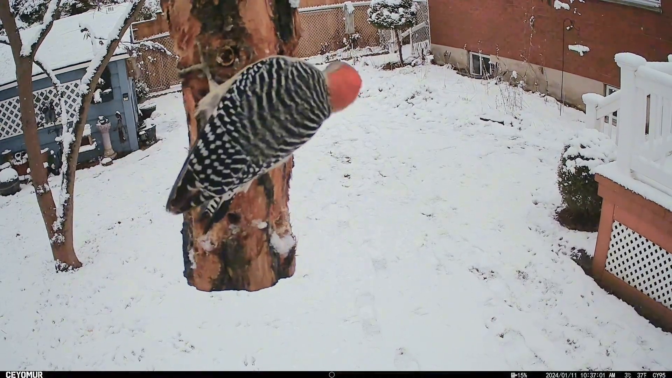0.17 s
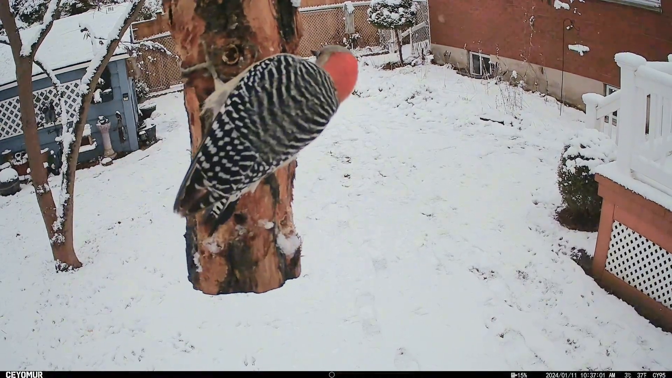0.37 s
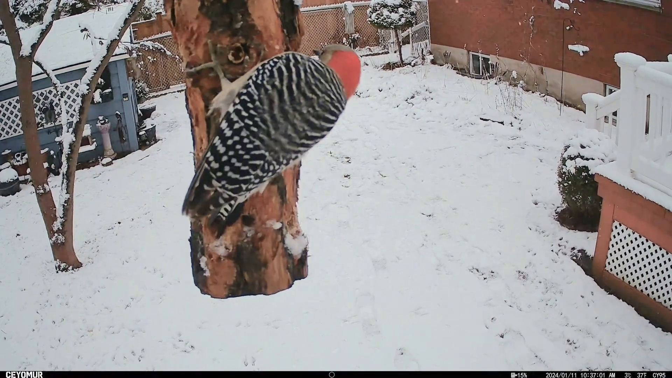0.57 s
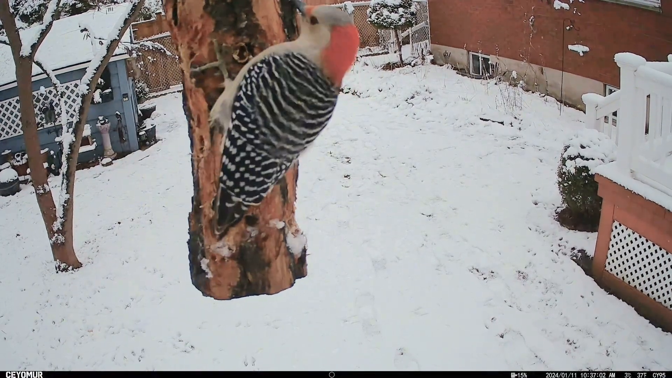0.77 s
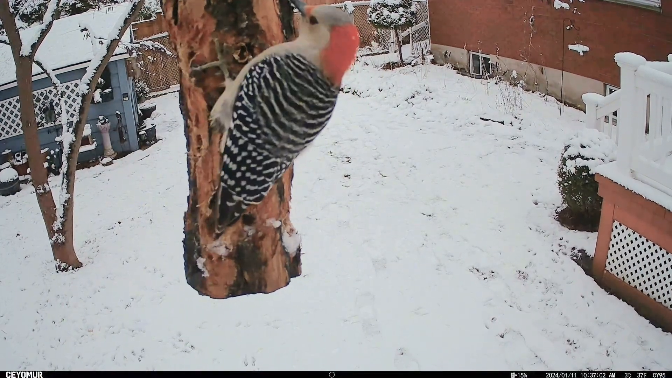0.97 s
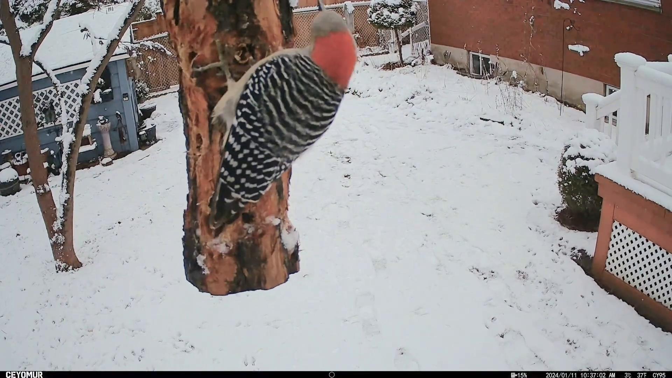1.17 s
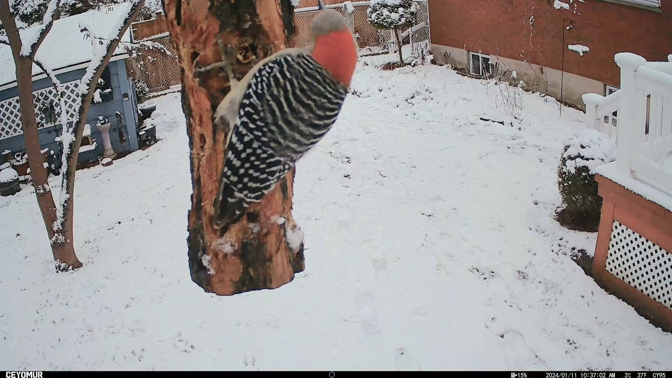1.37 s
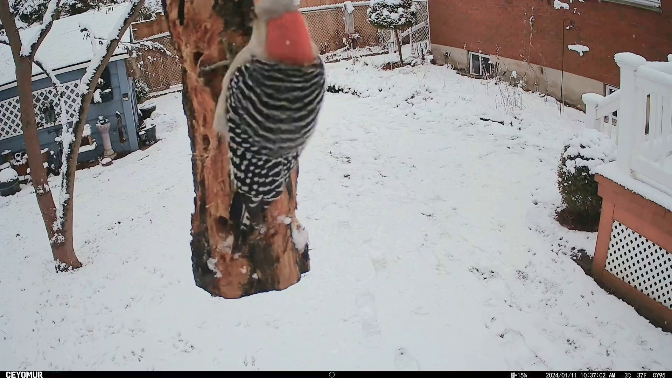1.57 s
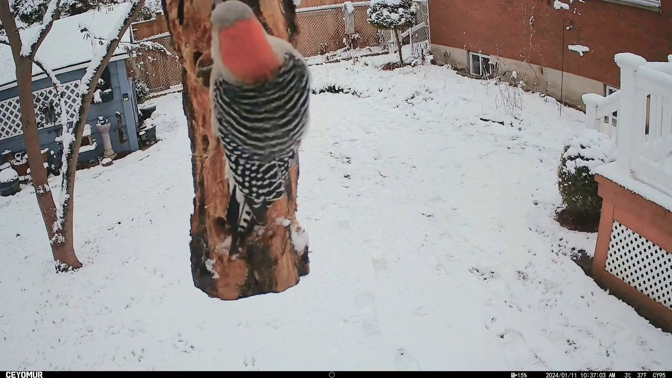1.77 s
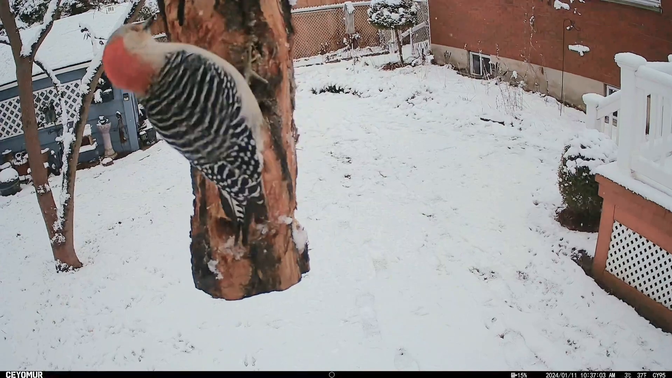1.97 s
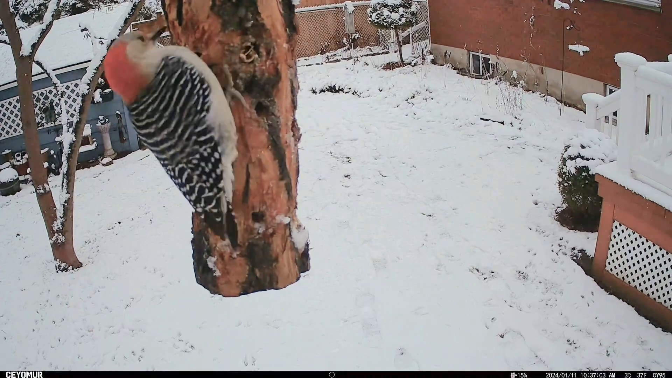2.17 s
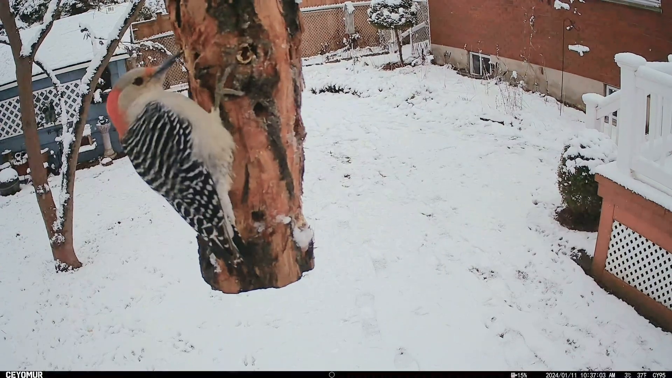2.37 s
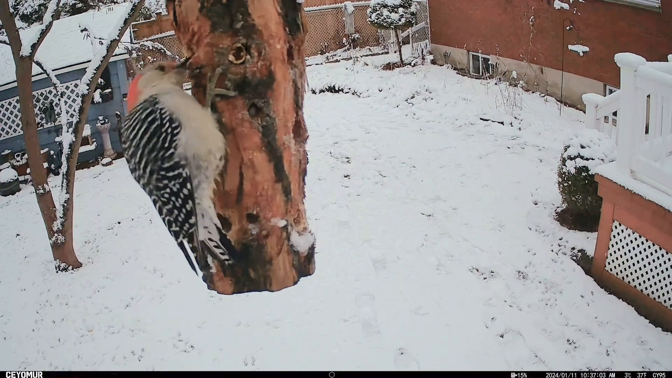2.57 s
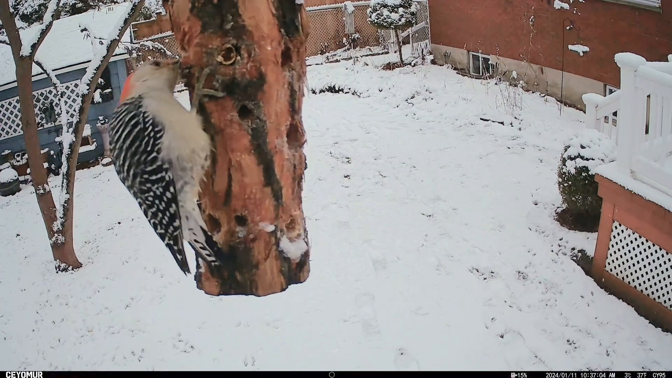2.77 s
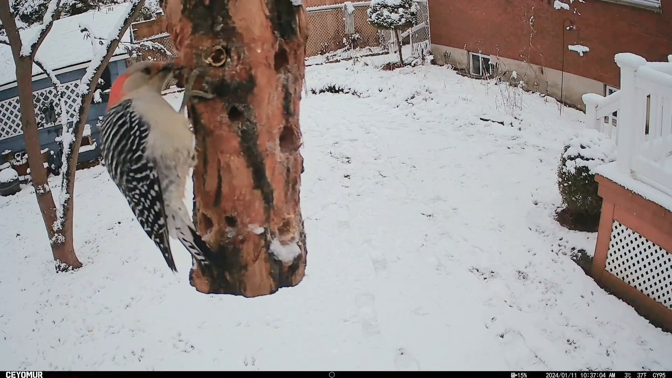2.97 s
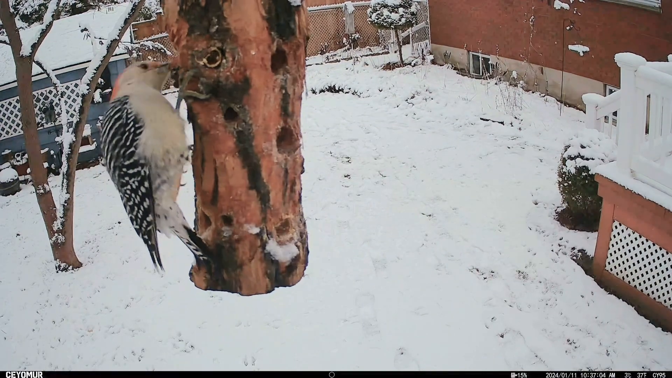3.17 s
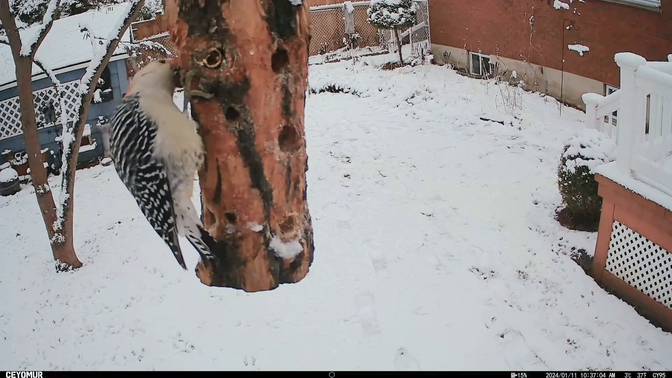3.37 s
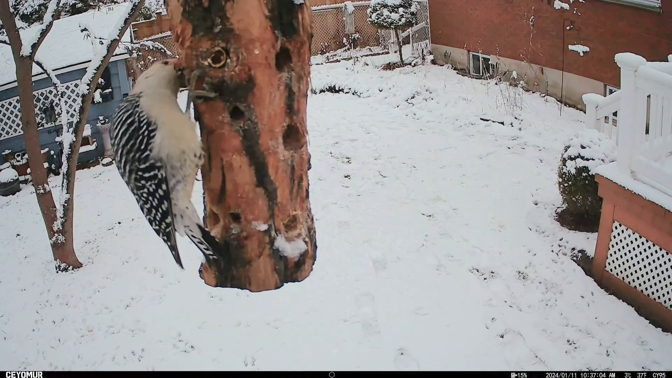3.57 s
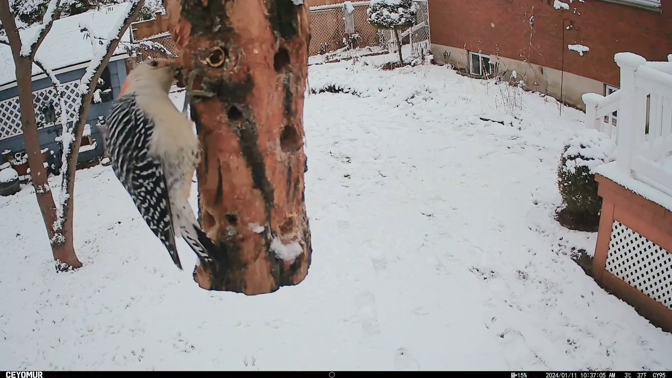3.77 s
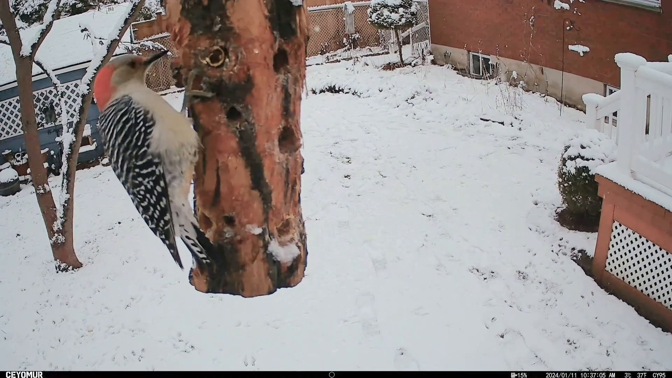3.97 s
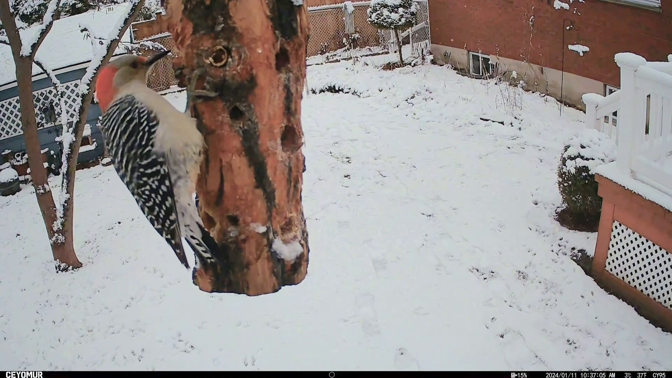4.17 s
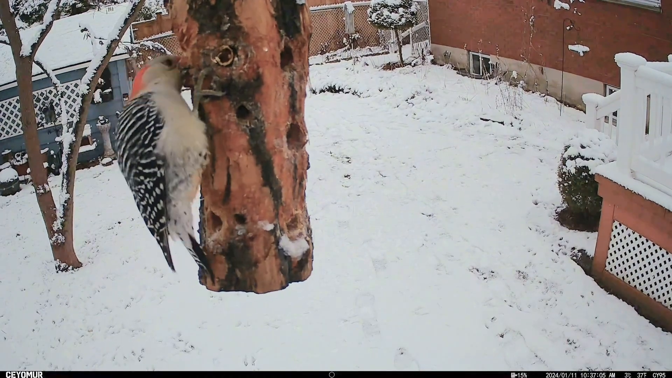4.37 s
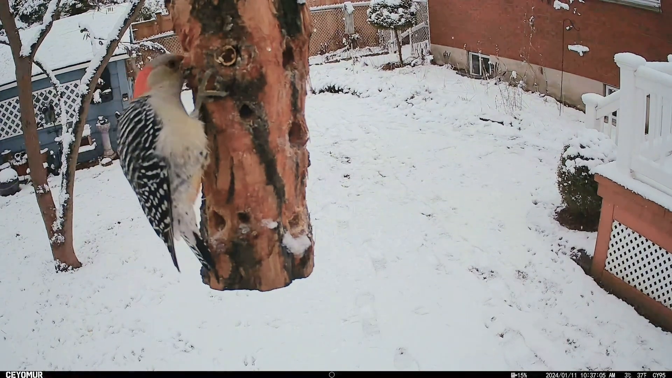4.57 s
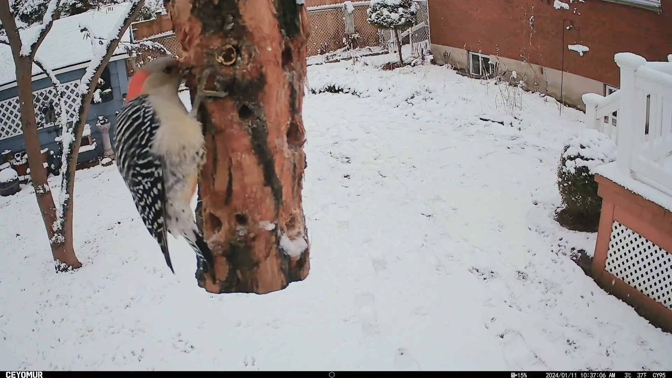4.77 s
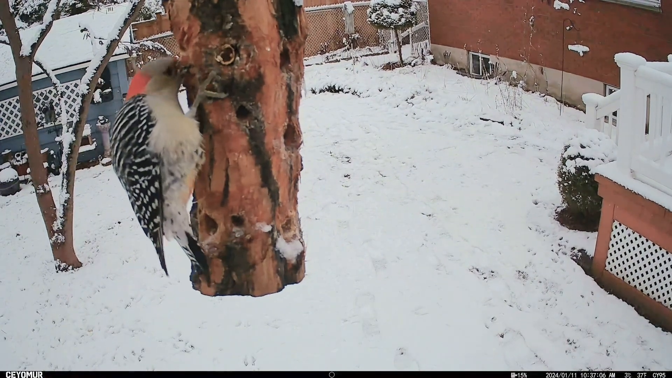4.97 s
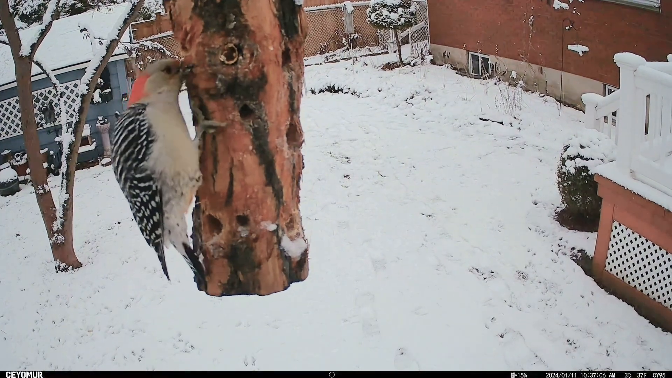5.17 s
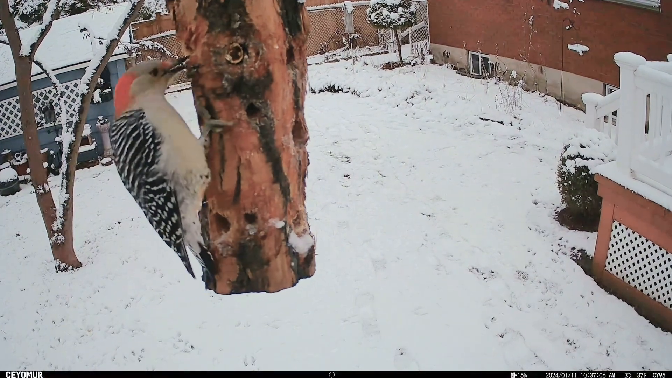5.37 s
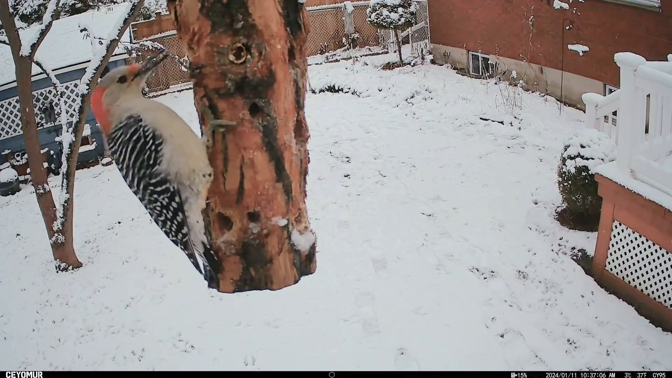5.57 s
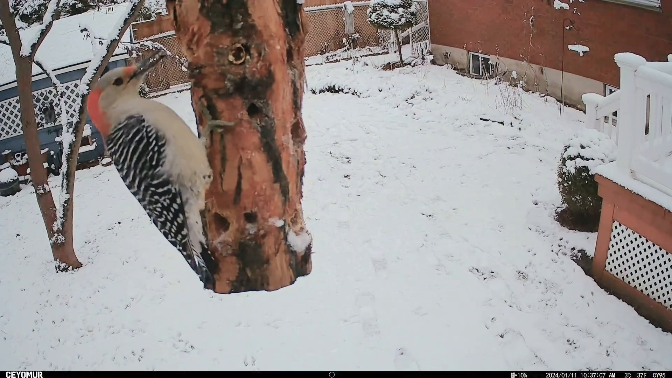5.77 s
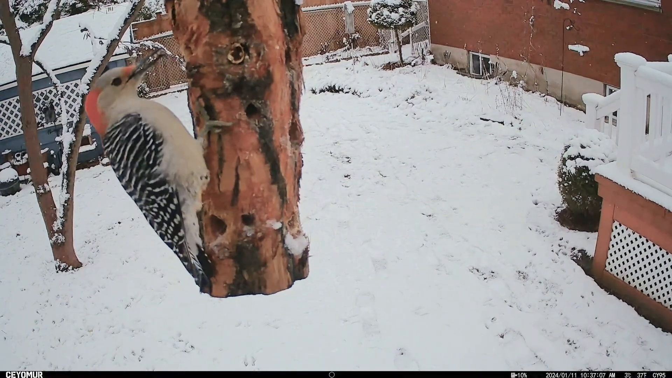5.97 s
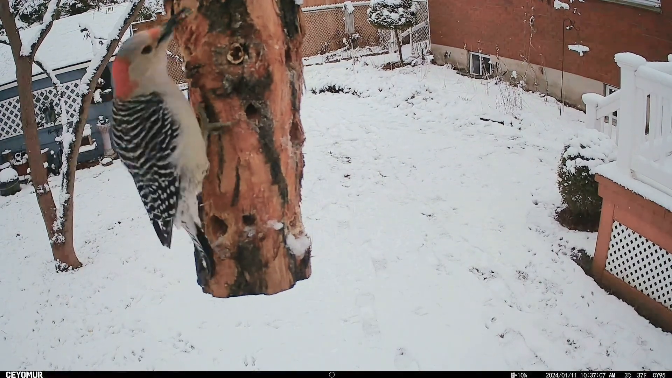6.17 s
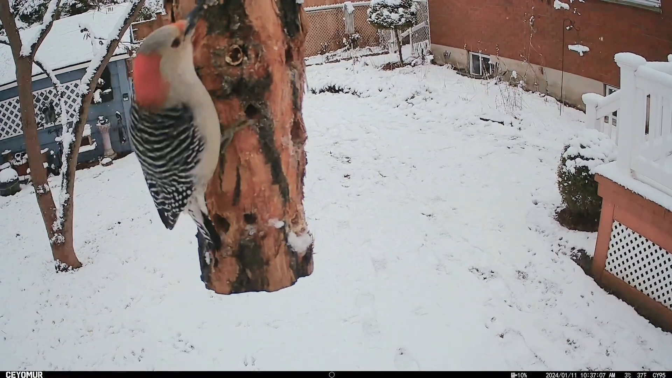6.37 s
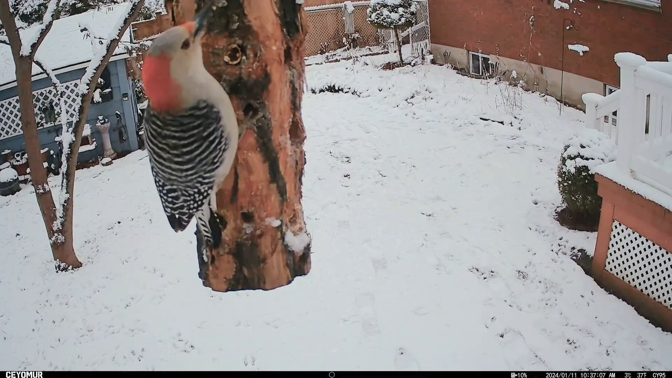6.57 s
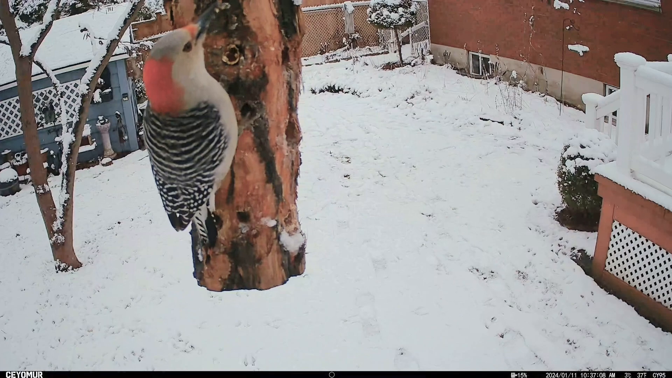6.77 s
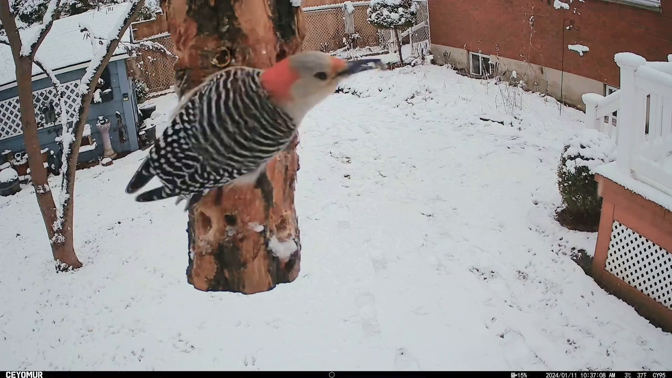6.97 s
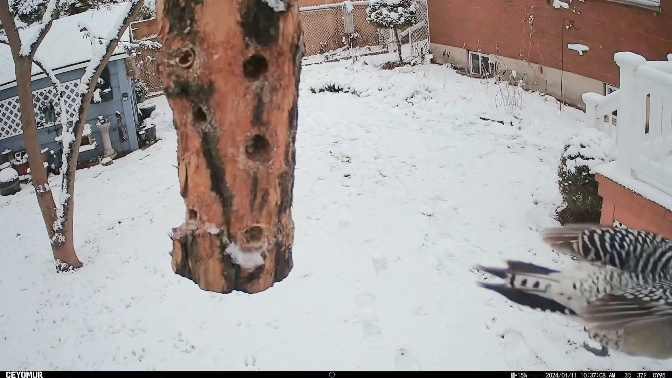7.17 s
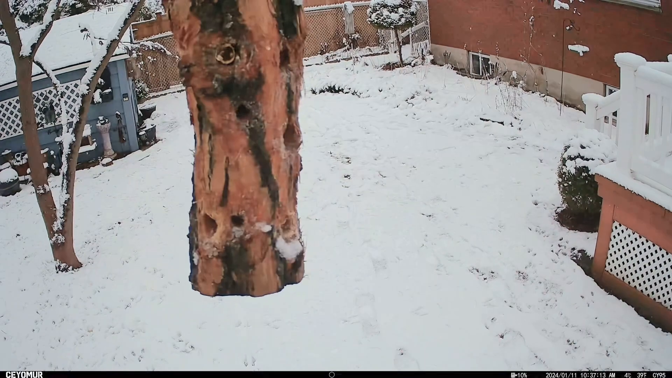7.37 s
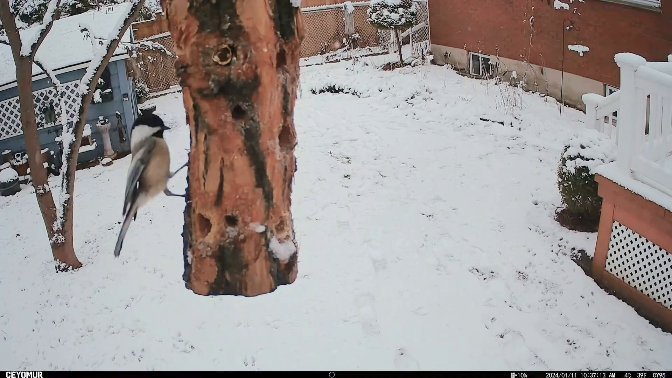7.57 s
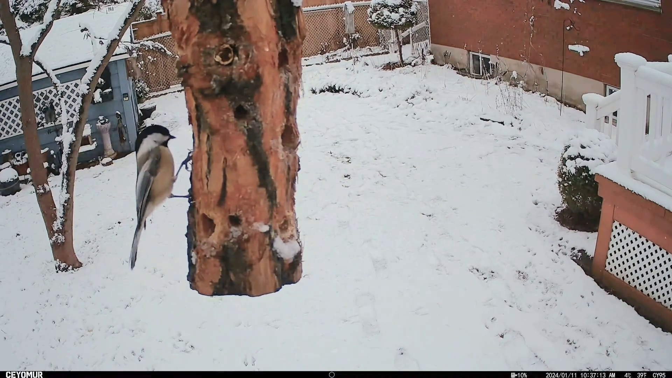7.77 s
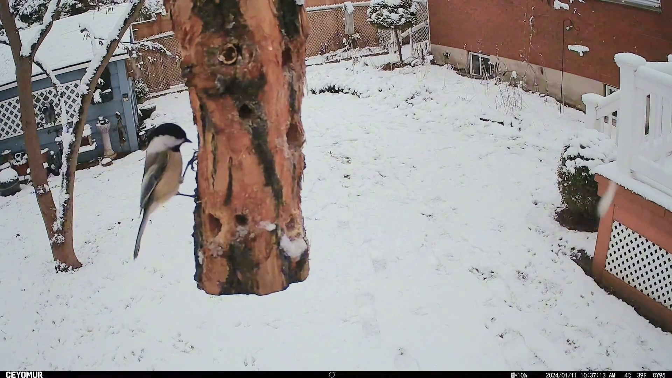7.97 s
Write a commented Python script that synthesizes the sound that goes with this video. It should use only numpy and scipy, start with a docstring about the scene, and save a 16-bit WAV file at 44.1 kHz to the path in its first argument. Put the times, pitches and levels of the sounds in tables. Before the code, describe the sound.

Close, structure-borne sound in a quiet snowy yard. Soft woody taps and low double thumps come irregularly over a swaying, almost subsonic rumble, with tiny ticks and thin steady hiss. Two brief high chirps have slight echoes. At about seven seconds the woodpecker leaves in a flurry of low gusts and rustle, with a hard claw knock, then an abrupt click and quieter rocking.

```python
"""A snowy yard with a hanging log feeder: a woodpecker's blows and hops shake the pole that holds the microphone.
They arrive through the structure as dull paired thuds and ringing taps over deep rocking, sway and rattle.
Faint ticks and steady hiss lie around them, and a small bird chips twice, as gliding near-sine notes with echoes.
The woodpecker flies off in gusts and rustles of filtered noise, knocking the housing, a body of struck modes.
A click then sounds and the wing noise stops abruptly; rocking, taps, ticks and hiss go on."""
import sys
import numpy as np
from scipy import signal
from scipy.io import wavfile
from scipy.ndimage import uniform_filter1d

SR = 44100
rng = np.random.default_rng(int(sys.argv[2]) if len(sys.argv) > 2 else 0)


def to_wav(sig):
    """Store sig (one row per channel, or 1-D mono) as 16-bit WAV at the path in sys.argv[1].

    Samples outside -1..1 are clipped; the rate is SR.
    """
    pcm = np.clip(np.atleast_2d(sig), -1, 1) * 32767
    pcm = np.round(pcm).astype(np.int16)
    wavfile.write(sys.argv[1], SR, pcm.T)  # frames by channels


N = 353726
EDGE_HZ = 15700  # upper band limit


def gain_of(db):
    """Decibel law: amplitude ratio of a level."""
    return 10 ** (np.asarray(db) / 20)


def evened(x):
    """Normalisation to an rms of 1."""
    return x / np.sqrt(np.mean(x ** 2) + 1e-20)


def levelled(x, steady):
    """Compression: partly evens out the chance swells of a noise."""
    x = evened(x)
    power = uniform_filter1d(x ** 2, SR // 12)
    return evened(x / (power + 0.024) ** (steady / 2))


def drift(seconds):
    """Low-passed chance: a smooth wander of rms 1 that changes over about this time."""
    size = int(seconds * SR)
    smooth = uniform_filter1d(rng.standard_normal(N), size)
    return evened(uniform_filter1d(smooth, size))


def curves(rows):
    """Linear interpolation: columns of a table, one value per sample."""
    s, *columns = np.transpose(rows)
    return [np.interp(np.arange(N) / SR, s, c) for c in columns]


def add(mix, s, sound):
    """Superposition: adds a sound into the mix from time s."""
    part = mix[max(round(s * SR), 0):][:len(sound)]
    part += sound[:len(part)]


def resonate(x, hz, width):
    """Two-pole resonance of gain 1 at its centre, applied twice for steep skirts."""
    b, a = signal.iirpeak(hz, hz / width, SR)
    return signal.lfilter(b, a, signal.lfilter(b, a, x))


def ring(hz, db, t60, rise):
    """Damped oscillation: one struck mode with a soft start."""
    t = np.arange(SR // 4) / SR
    decay = gain_of(db - 60 * t / t60)
    onset = 1 - np.exp(-(t / rise) ** 2)
    return decay * onset * np.sin(2 * np.pi * hz * t)


def shaken(modes, steady):
    """Random excitation: noise through modes (pitch Hz, width Hz, relative level dB), at rms 1."""
    bands = (gain_of(db) * evened(resonate(rng.standard_normal(N), hz, width)) for hz, width, db in modes)
    return levelled(sum(bands), steady)


# rocking of the pole: time_s, level_db (rms, before the drift)
ROCKING = [(0.0, -38.5), (0.31, -36), (0.38, -45.5), (1.03, -28), (1.25, -41.5), (1.49, -32.5), (1.58, -41),
           (2.08, -26), (2.32, -34), (2.41, -56), (2.52, -30), (2.72, -37.5), (2.9, -25.5), (3.21, -40),
           (3.48, -25), (4.29, -37), (4.38, -33.5), (4.44, -39.5), (4.6, -25), (5.52, -26.5), (6.92, -45),
           (6.99, -31.5), (7.3, -29), (7.37, -36), (7.62, -30.5), (7.73, -47.5), (7.93, -31), (8.02, -39.5)]
# shaking of the mount: time_s, sway_db, shudder_db (rms)
SHAKING = [(0.0, -46, -47), (0.47, -44, -51), (0.54, -41, -58), (1.14, -54, -57), (2.35, -41.5, -45),
           (2.39, -46, -51), (2.77, -38.5, -51.5), (2.93, -35.5, -40.5), (3.51, -40, -58), (3.55, -42, -45),
           (3.8, -44, -63), (4.8, -46, -44), (4.98, -33, -48.5), (5.96, -52.5, -57), (6.14, -54, -55),
           (6.19, -34, -44.5), (6.36, -39.5, -43), (6.63, -43.5, -54), (6.92, -39, -47.5),
           (6.97, -25.5, -45), (7.04, -30, -49), (7.21, -22.5, -32.5), (7.24, -32, -33.5),
           (7.44, -51, -56.5), (7.75, -43, -56), (8.02, -58, -60.5)]
# low sway resonances: pitch_hz, width_hz, level_db (relative)
SWAY_MODES = [(32.13, 3.06, 5.5), (40.05, 2.1, 0.5)]
# shudder resonances: pitch_hz, width_hz, level_db (relative)
SHUDDER_MODES = [(53.9, 13.3, 7.5), (62, 45, -20), (106, 55, -3)]
# rattle of the mount: time_s, dull_db, bright_db (rms, the bright part before its drift)
RATTLE_LEVELS = [(0.0, -61.5, -71), (0.29, -52.5, -66.5), (0.56, -61.5, -75), (0.91, -68, -79.5),
                 (1.65, -57.5, -73), (1.79, -59, -69), (2.5, -54, -75), (2.81, -54, -68.5),
                 (3.24, -46, -81), (3.39, -59, -67), (4.02, -62.5, -75), (4.38, -55.5, -72.5),
                 (4.56, -48.5, -61), (4.69, -48.5, -67.5), (5.0, -59, -63.5), (5.9, -67, -85),
                 (6.19, -59.5, -77.5), (6.34, -47.5, -79), (6.57, -59, -81), (6.75, -66.5, -77),
                 (6.88, -58, -66.5), (7.12, -39, -58), (7.28, -63, -75), (7.39, -65, -78), (7.71, -72, -81),
                 (8.02, -69, -88)]
# modes of the mount: pitch_hz, level_db (relative), t60_s, hardness_share (ratio)
MOUNT_MODES = [(163.3, -12.5, 0.24, 1), (227.8, -6.5, 0.18, 0), (244.7, -8, 0.12, 0.0054),
               (267, -11.5, 0.23, 0.24), (314.6, -0.5, 0.19, 0.17), (641.6, 2.5, 0.12, 0.75),
               (740, -6.5, 0.11, 0.84), (1000, -9, 0.072, 1), (1360, -29, .03, 0.14)]
ROCK_HZ, LATE_ROCK_HZ, RETUNE_S = 18.0, 15.5, 6.2  # the rocking is slower towards the end
ROCK_WANDER, ROCK_WANDER_DB = 0.06, 1.5  # rms drift of pitch (share) and level
BRIGHT_WANDER_DB = 2.5  # rms drift of the bright rattle
JOLTS_PER_S = 300  # on average


def rocking():
    """Slow oscillation: a deep sine whose pitch and level drift."""
    centre_hz = np.where(np.arange(N) / SR < RETUNE_S, ROCK_HZ, LATE_ROCK_HZ)
    hz = centre_hz * (1 + ROCK_WANDER * drift(0.12))
    level_db = curves(ROCKING)[0] + ROCK_WANDER_DB * drift(0.13)
    return np.sqrt(2) * gain_of(level_db) * np.sin(2 * np.pi * np.cumsum(hz) / SR)


def rattle():
    """Impulse response: a dense random train of small jolts excites the mount's own modes."""
    dull_db, bright_db = curves(RATTLE_LEVELS)
    sizes = gain_of(0.63 * rng.exponential(1, (2, N)))
    signs = rng.choice([-1., 1.], (2, N))
    jolts = sizes * signs * (rng.random((2, N)) < JOLTS_PER_S / SR)
    dull_body = sum(ring(hz, db, t60, 0.0051) for hz, db, t60, share in MOUNT_MODES[:3])
    bright_body = sum(ring(hz, db - 36 * share, t60, 0.0071) for hz, db, t60, share in MOUNT_MODES[3:])
    dull = levelled(signal.oaconvolve(jolts[0], dull_body)[:N], 0.34)
    bright = levelled(signal.oaconvolve(jolts[1], bright_body)[:N], 0.34)
    return gain_of(dull_db) * dull + gain_of(bright_db + BRIGHT_WANDER_DB * drift(0.08)) * bright


def pole():
    """Structure-borne vibration: deep rocking, resonant sway and shudder, and rattle."""
    sway_db, shudder_db = curves(SHAKING)
    sway = gain_of(sway_db) * shaken(SWAY_MODES, 0.28)
    shudder = gain_of(shudder_db) * shaken(SHUDDER_MODES, 1.0)
    return rocking() + sway + shudder + rattle()


# colour of the hiss: pitch_hz, level_db (relative spectral density)
HISS_COLOUR = [(210, -30), (350, -10.5), (385, -11), (430, -11.5), (572, -11.5), (630, -2.5), (693, -13),
               (922, -13.5), (1010, -9), (1290, -15), (2760, -18), (11000, -21.5), (13300, -19.5),
               (15500, -25)]
HISS_DB = -67.5  # rms


def hiss():
    """Stationary coloured noise: microphone hiss and still air, slightly patchy in time and pitch."""
    frames, hz = N // 128 + 5, np.fft.rfftfreq(512, 1 / SR)
    real, imaginary, patches = rng.standard_normal((frames, 257, 3)).T
    patches = evened(uniform_filter1d(uniform_filter1d(patches, 30, 0), 4, 1))
    f, db = np.transpose(HISS_COLOUR)
    colour_db = np.interp(np.log(hz + 1), np.log(f + 1), db)[:, None]
    spectrum = (real + 1j * imaginary) * gain_of(colour_db + 0.84 * patches)
    noise = signal.istft(spectrum, nperseg=512, noverlap=384)[1][:N]
    return gain_of(HISS_DB) * evened(noise)


# paired thuds, the weight swinging out and back: time_s, level_db (peak), gap_s, back_level_db (peak)
THUD_PAIRS = [(0.092, -45, 0.1, -36.5), (0.366, -45, .093, -45.5), (0.61, -42.5, 0.18, -49),
              (1.052, -49, .104, -47.5), (1.323, -44, 0.099, -47), (1.537, -46.5, 0.089, -47.5),
              (1.782, -39.5, 0.096, -41), (2.101, -35.5, 0.1, -41), (2.449, -36, 0.097, -39),
              (2.82, -36.5, 0.061, -53), (3.177, -36.5, 0.088, -43.5), (3.455, -45, 0.1, -44),
              (3.698, -48.5, 0.1, -44.5), (3.975, -39, 0.1, -42), (4.303, -37.5, 0.091, -35.5),
              (4.65, -37, 0.1, -42), (4.95, -38, .102, -40.5), (5.29, -39.5, 0.1, -40),
              (5.565, -39.5, 0.099, -41), (5.874, -40.5, 0.1, -44.5), (6.131, -43.5, 0.1, -43.5),
              (6.341, -46, 0.21, -47), (6.759, -51, 0.12, -56.5), (7.056, -62, .082, -41)]
OUT_HZ, BACK_HZ, SWELL_S = 114.4, 111.2, 0.024  # pitch of each thud, time to the top of its swell


def thuds():
    """Fundamental resonance: the lowest ring of the log swells and dies, twice per swing."""
    out, t = np.zeros(N), np.arange(SR // 3) / SR
    swell = t / SWELL_S * np.exp(1 - t / SWELL_S)
    for s, db, gap, back_db in THUD_PAIRS:
        start = s - 0.012  # the swell begins before the tabled time
        add(out, start, gain_of(db) * swell * np.sin(2 * np.pi * OUT_HZ * t))
        add(out, start + gap, gain_of(back_db) * swell * np.sin(2 * np.pi * BACK_HZ * t))
    return out


# faint ticks and snaps: time_s, level_db (main partial before its decay), pitch_hz
TICK_EVENTS = [(.098, -45, 12000), (.099, -48.5, 1000), (.793, -52, 8500), (1.036, -53, 9050),
               (1.766, -50.5, 1500), (2.037, -54, 9000), (2.331, -49.5, 4650), (2.525, -51, 1100),
               (2.893, -57, 8500), (3.041, -55, 8520), (3.189, -50, 3180), (3.302, -52.5, 7000),
               (4.043, -55, 8496), (4.503, -53, 3100), (4.673, -53, 5500), (4.677, -49, 960),
               (4.994, -56, 9026), (5.126, -52, 6900), (5.195, -43.5, 1030), (6.046, -51, 8500),
               (6.997, -56, 3522), (7.001, -52, 1000), (7.049, -52, 8500), (7.263, -47, 9050),
               (7.612, -53, 8600), (7.833, -45, 1150)]
# faint pings, the mount ringing on, and one small squeak: start_s, level_db (before decay), pitch_hz
PING_EVENTS = [(2.526, -67, 2120), (3.241, -58, 752), (4.512, -56.5, 775), (5.08, -63, 780)]
# click at which the wing noise stops: start_s, level_db (6 dB below its initial step)
CLICK = [(7.303, -36.5)]
TICK_T60_S, TICK_SHORTEN = 0.011, 0.37  # ring time at 1 kHz; higher ticks die faster by this power of pitch
OVERTONE, OVERTONE_DB = 1.85, -11  # pitch ratio and level relative to the main partial
UNDERTONE, UNDERTONE_DB = 0.582, -9
PING_T60_S = 0.13


def ticks():
    """Transient excitation: ticks of three inharmonic partials, short pings and one step-like click."""
    out = np.zeros(N)
    for s, db, hz in TICK_EVENTS:
        t60 = TICK_T60_S * (1000 / hz) ** TICK_SHORTEN
        top = min(hz * OVERTONE, EDGE_HZ)
        tick = ring(hz, db, t60, 1 / hz)
        tick = tick + ring(top, db + OVERTONE_DB, t60, 1 / top)
        tick = tick + ring(hz * UNDERTONE, db + UNDERTONE_DB, t60 / UNDERTONE, 1 / hz)
        add(out, s - 0.0005, tick)
    for s, db, hz in PING_EVENTS:
        add(out, s, ring(hz, db, PING_T60_S, 1 / hz))
    s, db = CLICK[0]
    add(out, s, gain_of(db + 6.0) * np.exp(-np.arange(800) / SR / 0.0013))
    return out


# taps of beak and feet: time_s, level_db (nominal peak), pitch_hz, hardness_db
TAP_EVENTS = [(0.178, -40.5, 236, -21), (0.447, -41, 233.5, -20), (0.696, -49, 215, -20),
              (0.766, -47, 200, -22), (0.822, -47, 294, -23), (0.923, -55.5, 218, -15),
              (1.153, -43, 219, -28), (1.402, -43.5, 230, -22), (1.592, -40.5, 269, -31),
              (1.734, -50, 202.7, -28), (1.816, -54, 298, -24), (1.866, -38.5, 236, -22),
              (1.966, -54, 295, -23), (2.053, -54, 280, -13.5), (2.181, -39.5, 241, -22),
              (2.327, -45, 205, -23), (2.368, -42.5, 228, -29), (2.531, -36, 238.6, -25.5),
              (2.733, -45, 238, -39), (2.811, -44.5, 228, -36), (2.9, -39, 224.4, -32),
              (2.94, -37, 220, -48), (3.162, -46, 230, -29), (3.252, -37.5, 225.5, -21),
              (3.285, -36.5, 211, -42), (3.532, -44, 222, -36), (3.658, -48, 214, -32),
              (3.781, -42.5, 215, -35), (3.967, -48, 221.8, -32), (4.059, -38.5, 231, -26),
              (4.259, -53, 213, -26), (4.29, -46, 218, -38), (4.381, -34.5, 222.5, -26.5),
              (4.512, -39.5, 219, -29), (4.585, -46, 207, -33), (4.679, -48.5, 263, -38),
              (4.733, -36.5, 241, -26), (4.902, -49.5, 207, -25), (5.037, -36.5, 225, -29),
              (5.082, -49.5, 299, -19), (5.248, -53, 243, -22), (5.275, -48.5, 223, -35),
              (5.368, -37, 224, -24), (5.552, -50.5, 235, -33), (5.651, -38.5, 225, -28),
              (5.861, -52, 223, -32), (5.954, -39.5, 223, -27), (6.094, -53, 217.7, -19),
              (6.213, -40, 210, -39), (6.269, -42.5, 229, -29), (6.463, -43.5, 234, -25),
              (6.774, -45, 232, -31), (6.94, -43.5, 220, -27), (7.13, -52, 208, -16),
              (7.339, -49.5, 290, -25), (7.925, -53.5, 242, -23)]


def taps():
    """Modal excitation: a short pitched blow sets the mount ringing; hard blows reach the upper modes."""
    out, luck = np.zeros(N), rng.standard_normal((len(TAP_EVENTS), len(MOUNT_MODES)))
    for (s, db, hz, hard_db), chances in zip(TAP_EVENTS, luck):
        blow = ring(hz, 5.6, 0.11, 0.0039)
        for (f, mode_db, t60, share), chance in zip(MOUNT_MODES, chances):
            mode_hz = f * (1 + 0.013 * chance)
            level_db = mode_db - 16.5 + share * (hard_db + 18)
            blow = blow + ring(mode_hz, level_db, t60, 1.24 / f)  # higher modes start faster
        add(out, s - 0.004, gain_of(db) * blow)
    return out


# chip notes: start_s, pitch_hz (held), level_db (rms at the top)
CHIP_NOTES = [(2.103, 7424, -47.5), (5.399, 7540, -50.5)]
# shape of every chip: time_s (from its start), pitch_share (ratio to held pitch), level_db (relative to top)
CHIP_SHAPE = [(0, 0.96, -25), (.008, .965, -15), (.019, .995, -3.5), (.037, 1.003, 0), (.045, 1.0, -7),
              (.049, 0.86, -15.5), (0.057, .64, -25)]


def chips():
    """Frequency modulation and reflection: notes hook up and drop off, echoed by the walls of the yard."""
    out, (s, share, db) = np.zeros(N), np.transpose(CHIP_SHAPE)
    t = np.arange(0, s[-1], 1 / SR)
    for start, held_hz, top_db in CHIP_NOTES:
        hz = held_hz * np.interp(t, s, share)
        tone = np.sin(2 * np.pi * np.cumsum(hz) / SR) * signal.windows.tukey(len(t), 0.1)
        add(out, start, np.sqrt(2) * gain_of(top_db + np.interp(t, s, db)) * tone)
    t = np.arange(SR // 3) / SR
    reflections = rng.standard_normal(len(t)) * (rng.random(len(t)) < 0.03)  # sparse
    yard = reflections * gain_of(-60 * t / 0.28) * (t > 0.01)  # t60 0.28 s, after a 10 ms gap
    echoes = signal.oaconvolve(out, yard / np.linalg.norm(yard))[:N]
    return out + gain_of(-12) * echoes


# feathers brushing the housing: time_s (of the peak), level_db, brightness_db
SCRAPE_EVENTS = [(7.127, -52, 3), (7.143, -54, -13), (7.206, -53, 4), (7.225, -55, -8), (7.247, -63, -3),
                 (7.264, -65, 10)]
SCRAPE_RISE_S, BRUSH_FLOOR_DB = 0.0044, -77


def strokes(t60, bright):
    """Envelope of friction: each scrape rises quickly, then decays; bright weighs its brightness."""
    t, level = np.arange(N) / SR, gain_of(BRUSH_FLOOR_DB)
    for s, db, bright_db in SCRAPE_EVENTS:
        decay = gain_of(db + bright * bright_db - 60 * np.maximum(t - s, 0) / t60)
        level = level + decay * np.clip(1 + (t - s) / SCRAPE_RISE_S, 0, 1)
    return level


# wing wind: time_s, level_db (rms)
WING_GUSTS = [(6.9, -63), (6.934, -43), (7.06, -37.5), (7.098, -52), (7.154, -27.5), (7.192, -32.5),
              (7.224, -29.5), (7.31, -43.5)]
LOW_T60_S, HIGH_T60_S = 0.14, 0.085  # decay of the low and high rustle
AIR_DB = -42.5  # gain on the square root of the low stroke envelope


def wings():
    """Turbulence and friction: lumpy low gusts and a grainy rustle on the housing; both end abruptly."""
    t = np.arange(N) / SR
    gust_modes = [(78, 46, 10.5), (121, 57, 7.5), (176, 27, 3), (234, 23, 5), (284, 37, -6)]
    gust = gain_of(curves(WING_GUSTS)[0]) * shaken(gust_modes, 0.37)
    lumps = evened(uniform_filter1d(rng.standard_normal(N), SR // 300))
    grain = evened(gain_of(3 * lumps))
    low_level = strokes(LOW_T60_S, 0)
    low = low_level * shaken([(626, 140, 5), (1030, 120, -6.5)], 0.71)
    high = gain_of(-9.5) * strokes(HIGH_T60_S, 1) * shaken([(1620, 740, -5), (2480, 1000, -17)], 0.71)
    air_level = gain_of(AIR_DB) * np.sqrt(low_level) * (t > SCRAPE_EVENTS[0][0])
    air = air_level * shaken([(9500, 14000, 0)], 0.5)
    sounding = (t > WING_GUSTS[0][0]) & (t < CLICK[0][0])  # silent from the click on
    return (gust + grain * (low + high + air)) * sounding


# modes of the housing: pitch_hz, level_db (relative), t60_s
HOUSING_MODES = [(470, -7, .02), (635, -4, .055), (935, -2, .035), (1150, -14, .025), (1405, -5, .028),
                 (1668, -2, .022), (1980, -9, .015), (2290, -17, .018), (2560, -19, .018),
                 (2970, -16, .014), (3410, -15, .014), (3740, -18, .012), (4430, -11, .012),
                 (5350, -22, .01), (5830, -26, .01), (7400, -26, .006)]
# claw on the housing: start_s, level_db (peak of the modal part)
CLAW_KNOCK = [(7.199, -17.5)]
CRACK_DB, CRACK_T60_S = -15.5, 0.021  # rough noise: rms at its start relative to the modal peak, decay


def knock():
    """Modal impact: a claw hits the housing and bounces once."""
    out = np.zeros(N)
    body = sum(ring(*mode, 0.000063) * (-1) ** k for k, mode in enumerate(HOUSING_MODES))
    t = np.arange(len(body)) / SR
    noise = evened(resonate(rng.standard_normal(len(body)), 1430, 1460.0))
    crack = noise * gain_of(CRACK_DB - 60 * t / CRACK_T60_S)
    s, db = CLAW_KNOCK[0]
    hit = gain_of(db) * (body / abs(body).max() + crack)
    add(out, s, hit)
    add(out, s + 0.003, gain_of(-11) * hit)  # the bounce
    return out


def scene():
    """Superposition of all sources, as one channel."""
    return (pole() + hiss() + thuds() + ticks() + taps() + chips() + wings() + knock())[None]


def record(dry):
    """Band limitation: a linear-phase low-pass at the upper edge."""
    low_pass = signal.firwin(1023, EDGE_HZ, window=("kaiser", 10), fs=SR)
    return signal.oaconvolve(dry, low_pass[None], "same")


dry = scene()
out = record(dry)
to_wav(out)
```